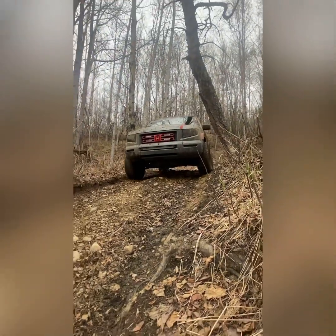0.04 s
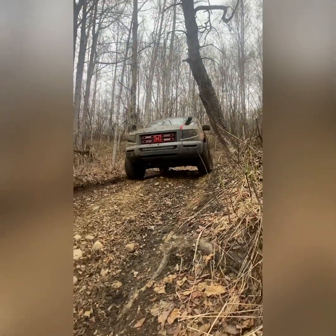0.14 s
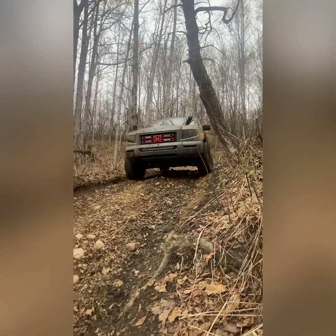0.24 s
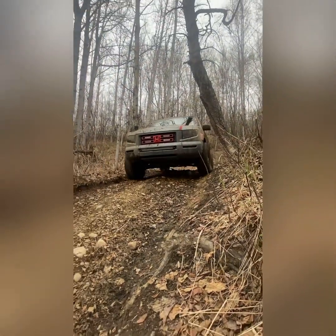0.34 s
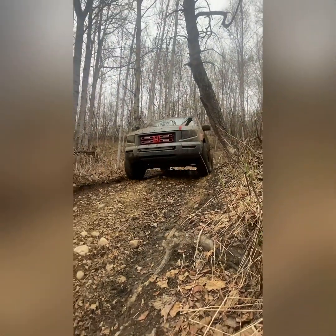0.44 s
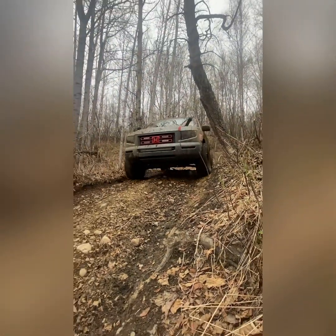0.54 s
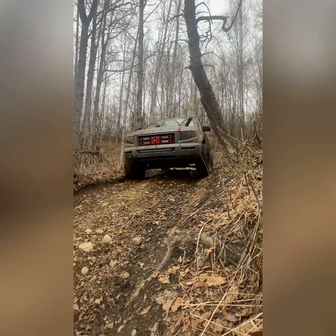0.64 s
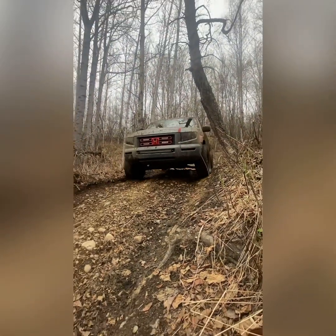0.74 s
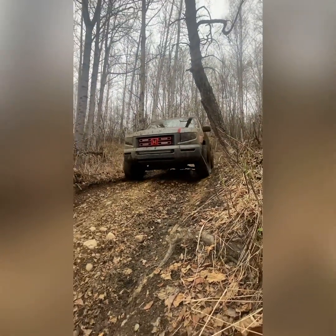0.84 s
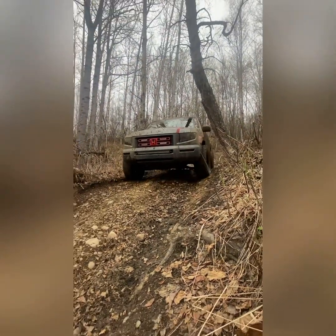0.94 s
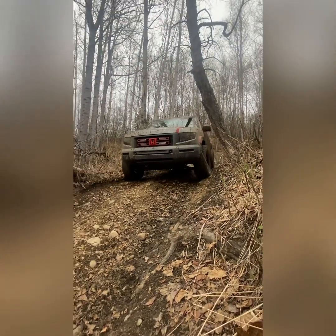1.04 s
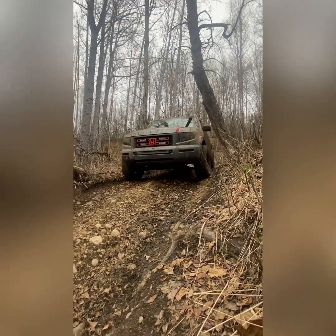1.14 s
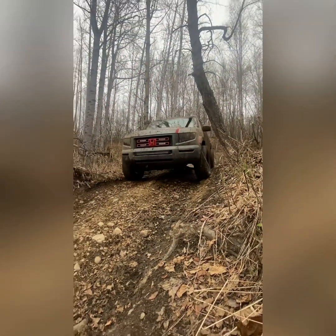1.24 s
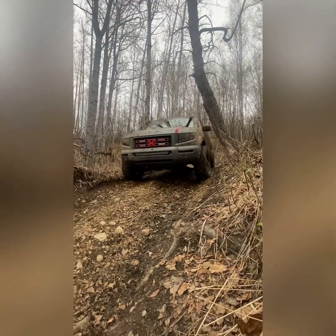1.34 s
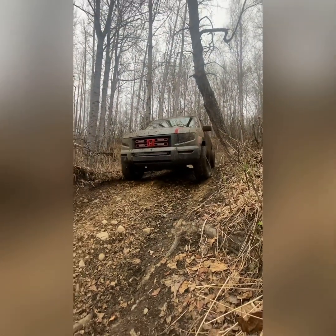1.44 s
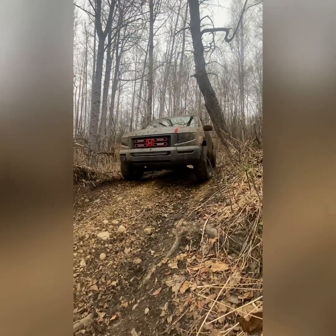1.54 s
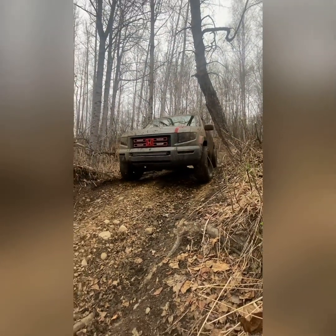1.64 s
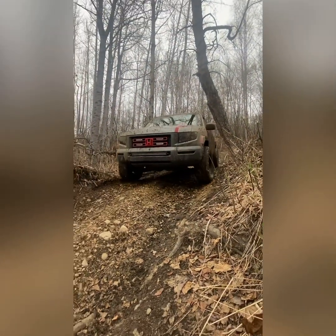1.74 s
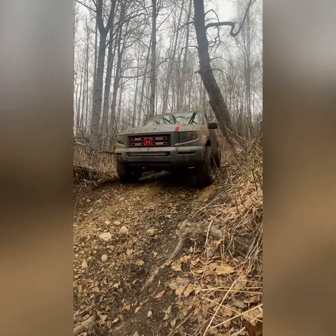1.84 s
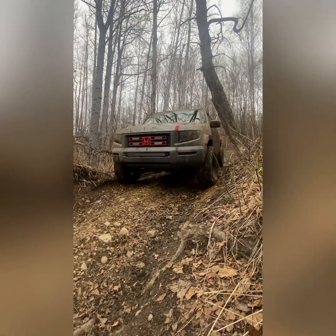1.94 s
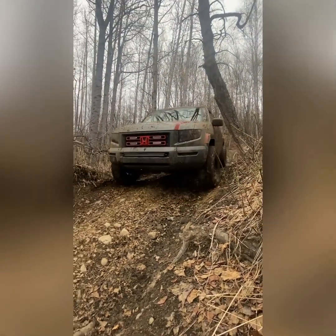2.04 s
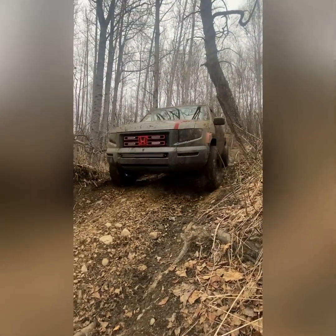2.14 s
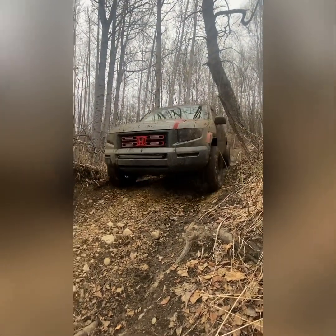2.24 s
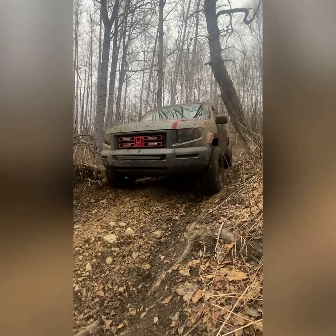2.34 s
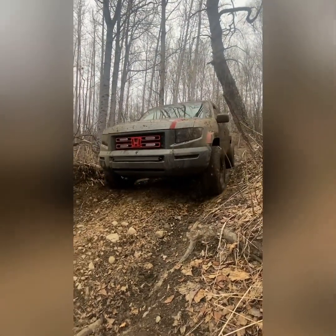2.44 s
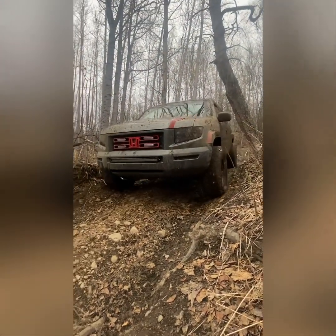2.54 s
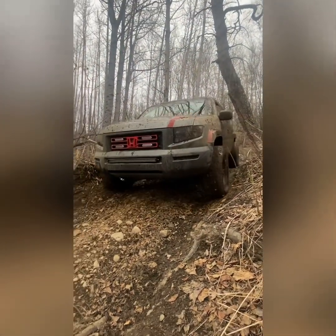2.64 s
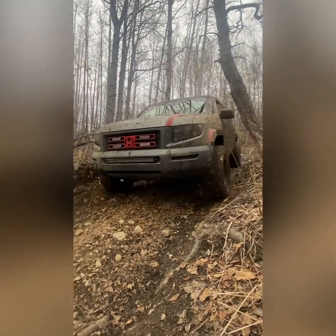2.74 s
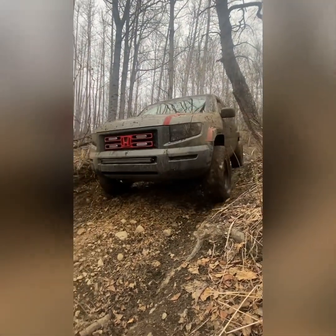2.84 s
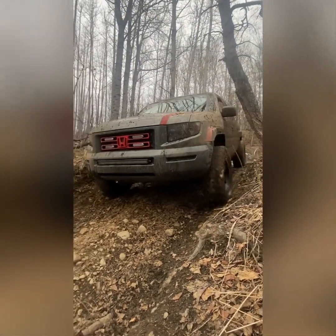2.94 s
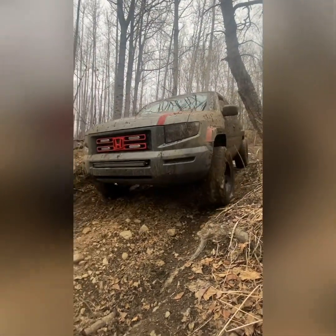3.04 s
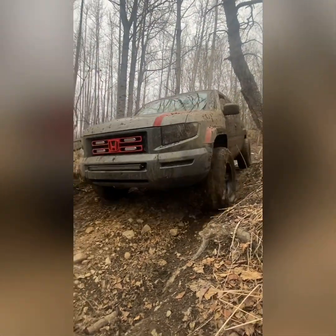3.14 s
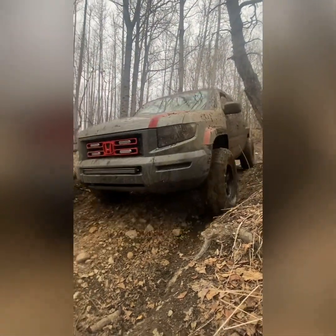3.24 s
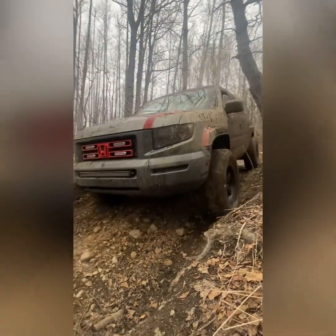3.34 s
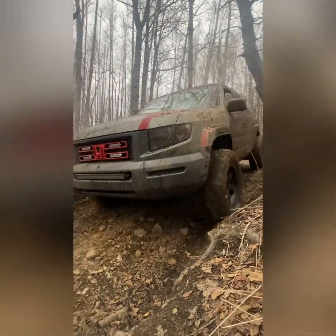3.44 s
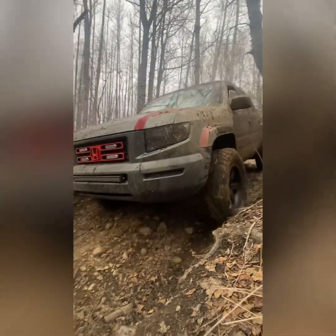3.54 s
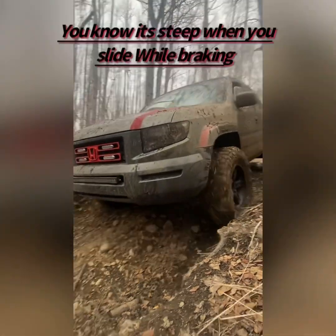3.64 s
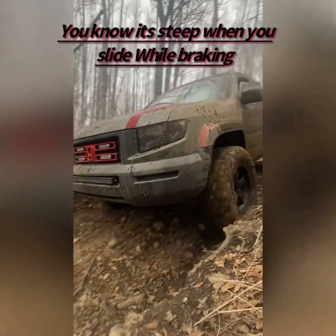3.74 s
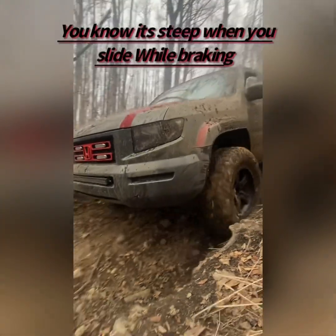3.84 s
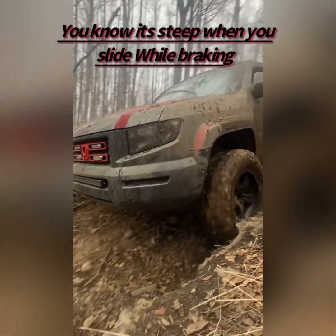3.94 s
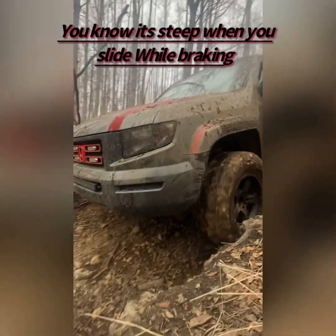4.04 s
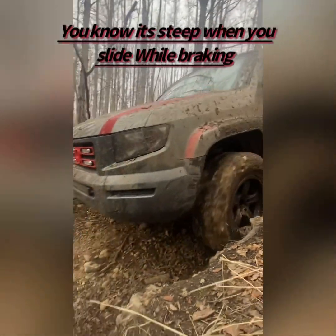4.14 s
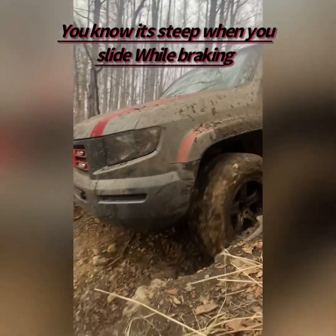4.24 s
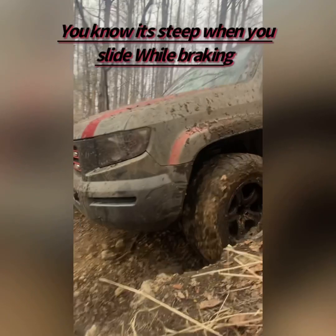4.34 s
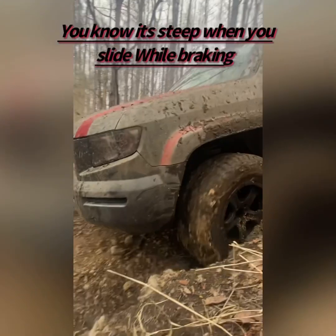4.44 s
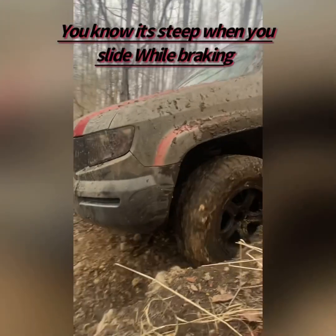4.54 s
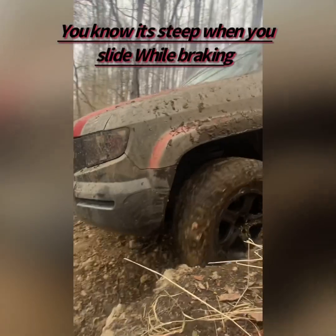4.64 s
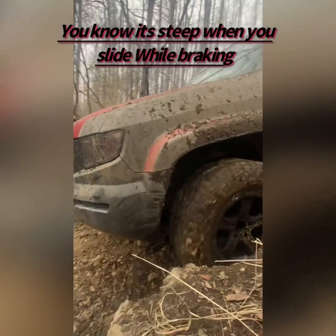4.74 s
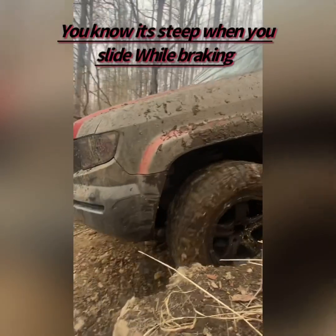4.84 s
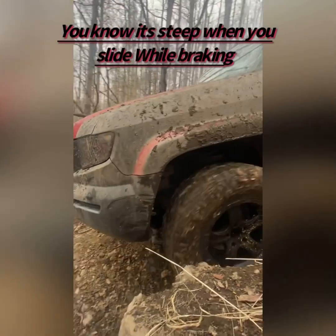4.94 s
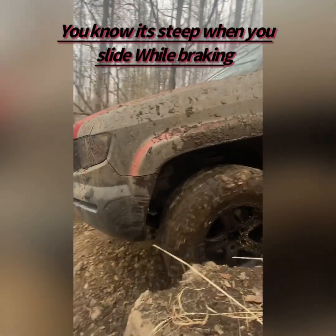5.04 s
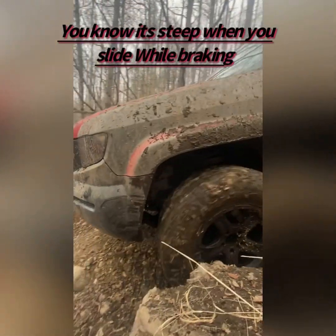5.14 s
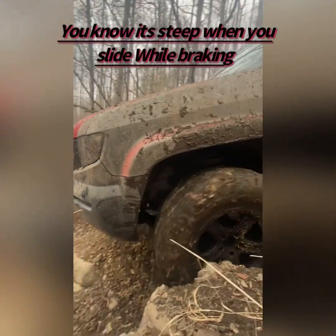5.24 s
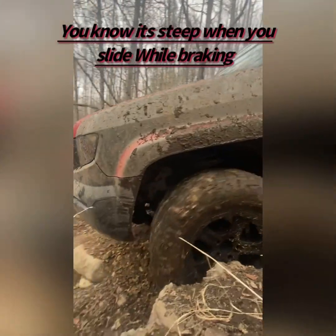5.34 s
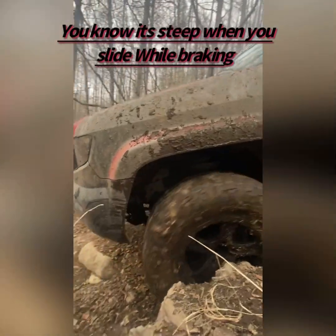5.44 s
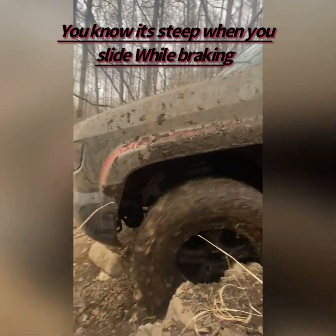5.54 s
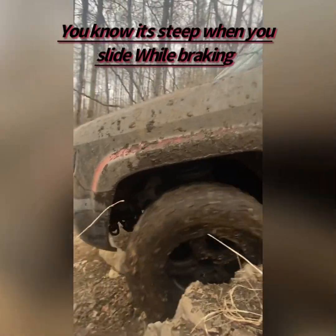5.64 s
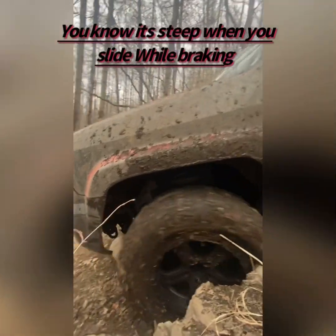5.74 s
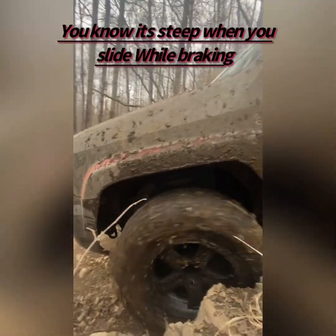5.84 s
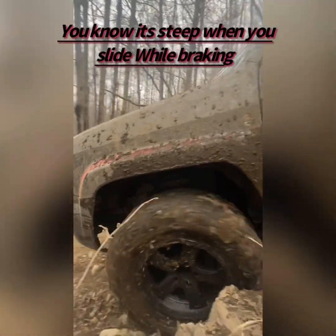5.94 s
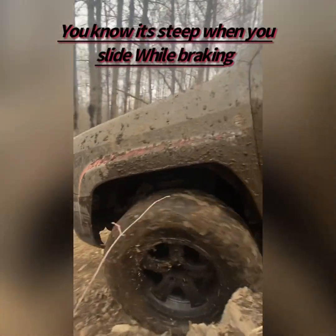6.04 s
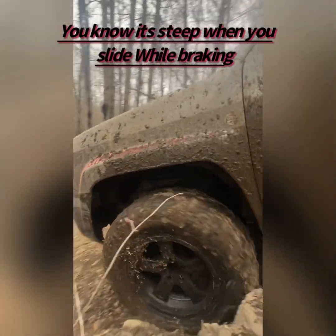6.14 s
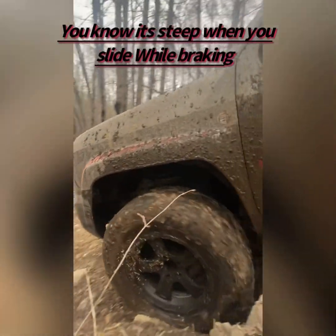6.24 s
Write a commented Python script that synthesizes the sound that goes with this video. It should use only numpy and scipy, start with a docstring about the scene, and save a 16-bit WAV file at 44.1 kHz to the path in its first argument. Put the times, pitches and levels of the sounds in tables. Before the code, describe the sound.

A truck idles slowly down a steep dirt trail, its low exhaust drone growing closer as tyres grind over gravel, knocking stones and snapping twigs.

```python
"""A steep dirt trail: a six-cylinder truck idles down it towards a phone held close to the ground.
The exhaust drones as sine lines on multiples of the firing rate, two of them strong.
The engine bay whirs as throbbing noise, through sliding panel resonances and a ground echo.
Tyres grind as shaped noise and clicks, knocking stones as gliding pitches with bursts of noise,
loose gravel as clustered grains, and twigs snap as short bands of noise."""
import sys
import numpy as np
from scipy import signal
from scipy.fft import rfft, irfft
from scipy.io import wavfile
from scipy.ndimage import uniform_filter1d

SR = 44100
rng = np.random.default_rng(int(sys.argv[2]) if len(sys.argv) > 2 else 0)


def convert_level_to_amplitude(level_db):
    """Map a level in decibels to its linear amplitude factor."""
    exponent = np.asarray(level_db, float) / 20
    return 10 ** exponent


def put_to_file(sound):
    """Save the sound as 16-bit audio at rate SR, in the file named by the first command-line argument."""
    columns = np.atleast_2d(sound).T  # one column per channel
    safe = np.clip(columns, -1, 1)
    whole_steps = np.round(safe * 32767)
    wavfile.write(sys.argv[1], SR, whole_steps.astype(np.int16))


N = 277830
TIME = np.arange(N) / SR
FREQ = np.fft.rfftfreq(N, 1 / SR)

# noise colour of a stone splitting or shifting: (f/Hz, relative density/dB)
STONE_CRACK = [(150, -5), (300, 13.5), (1000, 9.5), (2500, -14), (5000, -41)]


def unit(x):
    """Scale to rms 1."""
    return x / np.sqrt(np.mean(x ** 2))


def columns(table, at=TIME):
    """Each column after the first, joined by straight lines."""
    key, *rest = np.transpose(table)
    return [np.interp(at, key, c) for c in rest]


def colour(x, spectrum):
    """Shape a signal by (f/Hz, level/dB) points, straight over log frequency, and scale to rms 1."""
    hz, db = np.transpose(spectrum)
    gain_db = np.interp(np.log(FREQ + 1), np.log(hz), db)
    return unit(irfft(rfft(x) * convert_level_to_amplitude(gain_db), N))


def ring(x, hz, width_hz):
    """One resonance: a band-pass peak of the given width."""
    return signal.lfilter(*signal.iirpeak(min(hz, .45 * SR), hz / width_hz, fs=SR), x)


def walk(rate):
    """Random levels held 1 / rate s and slewed twice; spread near 1."""
    k = int(SR / rate)
    held = np.repeat(rng.standard_normal(N // k + 1), k)
    return 1.3 * uniform_filter1d(uniform_filter1d(held, k), k)[:N]


def grit(rate, spread_db):
    """Scattered clicks of either sign, rate per second, mostly small, a few large; rms 1."""
    u = rng.random((3, N))
    size_db = spread_db * np.minimum(-np.log(1 - u[2]), 3)
    return unit((u[0] < rate / SR) * np.sign(u[1] - .5) * convert_level_to_amplitude(size_db))


def bell_swells(events):
    """Sum of bell-shaped gains from (t loudest/s, level/dB, half length/s) rows."""
    return sum(convert_level_to_amplitude(db) * np.exp(-((TIME - s) / half_s) ** 2) for s, db, half_s in events)


def exhaust(phase, second_db, third_db):
    """The pipe booms on two multiples; uneven cylinders leave faint wavering lines between and above."""
    # fainter exhaust lines: (multiple of the firing rate, level/dB at mean load)
    faint_lines = [(7 / 3, -60.5), (8 / 3, -65), (10 / 3, -59.5), (4, -54.5), (13 / 3, -66), (5, -57),
                   (6, -58.5), (7, -59.5)]
    # lines halfway between multiples, which grow with the boom:
    # (multiple of the firing rate, level/dB against the second multiple)
    halfway_lines = [(1.5, -36.5), (2.5, -25), (3.5, -29), (4.5, -44.5), (5.5, -41.5), (6.5, -40),
                     (7.5, -42)]
    # lead of the third multiple over the boom, further lead per higher one, lead of the halfway lines
    third_rad, step_rad, half_rad = 1.3, 3.0, 2.6
    load_per_order = 0.14  # share of the boom's growth per multiple

    jitter_rad = .04 * walk(15)
    second_gain = convert_level_to_amplitude(second_db + 0.62 * walk(2.5) + 0.33 * walk(20))
    boom = second_gain * np.sin(2 * phase + jitter_rad)
    third_gain = convert_level_to_amplitude(third_db + 0.85 * walk(13))
    boom += third_gain * np.sin(3 * phase + third_rad + 2 * jitter_rad)
    # the higher a faint line, the more it grows with the load
    load_db = second_db - second_db.mean()
    for order, db in faint_lines:
        waver_db, waver_rad = 2.2 * walk(6), .35 * walk(7)
        # whole multiples come from the same firing pulse; the fractions start anywhere
        if order % 1:
            start_rad = 2 * np.pi * rng.random()
        else:
            start_rad = third_rad + step_rad * (order - 3)
        gain = convert_level_to_amplitude(db + load_per_order * order * load_db + waver_db)
        boom += gain * np.sin(order * phase + start_rad + waver_rad)
    for order, db in halfway_lines:
        boom += convert_level_to_amplitude(db + second_db + 0.94 * walk(3.81)) * np.sin(order * phase + half_rad)
    return np.sqrt(2) * boom  # table levels become rms


def bay(phase, whir_db):
    """Fan, belts and valve gear: a broad whir that throbs with each firing and rings the panels."""
    # bay resonances: (f/Hz, width/Hz, share of the slide, quiet level/dB)
    panel_modes = [(346.4, 44, 0.02, -65), (600, 78, .2, -56.5), (793, 79, .3, -57.5), (1041, 91, 1.3, -59),
                   (1310, 29, 0.0647, -61.5), (1402.4, 39, -.25, -65.5), (1980, 94, -0.11, -88),
                   (1209, 48, .3, -75), (1552, 36, .2, -70.5), (1785, 80, -0.12, -84)]
    # swells of each resonance in turn as the truck turns past: rows of (t loudest/s, level/dB, half length/s)
    panel_swells = [
        [(3.45, -49.5, 0.42), (5.9, -53, 0.72)],
        [(2.8, -57, 0.57), (4.95, -54, 0.07), (5.6, -56, 0.21)],
        [(1.8, -60, 0.4), (2.8, -45.5, 0.98), (4.2, -51, 0.49)],
        [(1.2, -60.5, 0.5), (2.7, -47.5, 0.19), (3.1, -48, 0.079), (3.8, -51.5, 0.27), (4.9, -49.5, 0.22),
         (5.5, -49.5, 0.21)],
        [(2.3, -53, 0.047), (3.5, -53.5, 0.3)],
        [(2.05, -56, 0.47), (3.9, -45.5, 0.33), (4.8, -55.5, 0.2)],
        [(.35, -64, 0.068), (3.1, -57, 0.69), (3.9, -54.5, 0.24)],
        [(.2, -55, 0.22), (2.4, -56, 0.27), (4.75, -55.5, 0.17)],
        [(3.6, -56, 0.58), (4.6, -55.5, 0.2), (5.45, -54.5, 0.15)],
        [(.3, -56, 0.43), (2.9, -53, 0.59), (4.3, -58, 0.12), (5.8, -81, 0.14)],
    ]
    # the resonances slide as the truck tilts and turns: (t/s, pitch ratio)
    pitch_slide = [(0, 0.98), (.5, 0.99), (1.3, 1.08), (2.75, 1), (3.15, 1.07), (3.5, 0.93), (4.2, 0.96),
                   (4.5, .9), (5.0, 0.94), (5.6, 1.02), (6.3, 0.94)]
    # colour of the broad whir: (f/Hz, relative density/dB)
    whir_colour = [(200, -32), (330, 0), (470, -7), (590, -2.5), (710, -2), (850, 1), (1400, -6),
                   (2000, -10), (2300, -18), (2650, -33), (3300, -30), (3700, -24), (5000, -38)]
    # thin whine from the grille, fading as it turns away: (t/s, level/dB)
    whine_level = [(0, -61.5), (1.6, -61.5), (2.4, -65.5), (6.3, -89)]
    # bands of the whine: (f/Hz, width/Hz, level/dB against the whine)
    whine_bands = [(3000, 50, -1), (3630, 240, -2)]
    ground_ms, ground_db = 4.9, -11.5  # ground echo: delay at slide ratio 1, level against the whir

    slide = columns(pitch_slide)[0] - 1
    throb = 1 + 0.074 * np.cos(phase)
    panels = 0
    for (hz, width_hz, share, quiet_db), swells in zip(panel_modes, panel_swells):
        gain = convert_level_to_amplitude(quiet_db) + bell_swells(swells)
        once = ring(throb * rng.standard_normal(N), hz, width_hz)
        steady = unit(ring(once, hz, width_hz) + 0.32 * once)
        # reading faster or slower shifts the pitch; each panel also wavers alone
        place = np.cumsum(1 + share * slide + .012 * walk(6) + .008 * walk(20))
        flutter = convert_level_to_amplitude(0.38 * walk(3.04) + 1.0 * walk(14))
        panels += gain * flutter * np.interp(place, np.arange(N), steady, period=N)

    whine = 0
    for hz, width_hz, db in whine_bands:
        whine += convert_level_to_amplitude(db) * unit(ring(rng.standard_normal(N), hz, width_hz))
    whine = convert_level_to_amplitude(columns(whine_level)[0]) * whine

    drive = throb * (rng.standard_normal(N) + 0.26 * grit(600, 2.1))
    whir = colour(drive, whir_colour)
    # the ground under the truck mirrors the whir; the late copy combs it into bands that slide too
    lag = ground_ms / 1000 * SR / (1 + 0.53 * slide)
    whir = whir + convert_level_to_amplitude(ground_db) * np.interp(np.arange(N) - lag, np.arange(N), whir, period=N)
    wobble_db = 1.0 * walk(6) + 1.0 * walk(25)
    return convert_level_to_amplitude(whir_db + wobble_db) * unit(whir) + panels + whine


def tyres(rumble_db, hiss_db, leaf_db, patches):
    """Rubber dragging over dirt rumbles and hisses, small stones tick, dry leaves prickle in patches."""
    # colours of the rumble, the dirt hiss and the leaves: (f/Hz, relative density/dB)
    rumble_colour = [(25, -20), (45, 5), (90, -4), (150, -1), (200, 0.5), (260, 0), (330, -10.5),
                     (500, -6.5), (800, -43)]
    hiss_colour = [(1500, -18), (2400, 20), (2750, 18), (3050, 16), (3300, 15.5), (3700, 11.5), (4400, 3.5),
                   (5800, 10), (7000, -1), (9000, -42.5)]
    leaf_colour = [(4000, 4), (6500, 11.5), (8000, 14), (10000, 3), (12500, -1), (14800, -29), (15700, -41),
                   (15900, -55)]
    ticks_per_s, ticks_db = 110, -7  # stones ticking under the tread; level against the rumble

    rumble_gain = convert_level_to_amplitude(rumble_db + 1.6 * walk(6.15) + 0.8 * walk(29.0))
    rumble = rumble_gain * colour(rng.standard_normal(N), rumble_colour)
    ticks = convert_level_to_amplitude(rumble_db + ticks_db) * colour(grit(ticks_per_s, 2.1), STONE_CRACK)
    crush = rng.standard_normal(N) + .4 * convert_level_to_amplitude(2.5 * patches) * grit(1500, 3.0)
    patch_db = .6 * patches + .8 * walk(20)
    hiss = convert_level_to_amplitude(hiss_db + patch_db) * colour(crush, hiss_colour)
    leaves = convert_level_to_amplitude(leaf_db + 0.74 * patches + 1.6 * walk(16)) * colour(crush, leaf_colour)
    return rumble + ticks + hiss + leaves


def stones():
    """Each knock is a few cycles gliding in pitch over a burst of crack, then a scatter off the bodywork."""
    # stones knocking under the tread: (t/s, level/dB, first pitch f/Hz, last pitch f/Hz, decay/ms)
    knocks = [(2.139, -32, 800, 485, 2.4), (2.415, -35.5, 797, 380, 8.4), (3.914, -33, 746, 640, 3.9),
              (3.926, -33, 684.2, 680, 3.5), (3.939, -31, 800, 700, 3.1), (3.9574, -23, 1520, 405, 3.03),
              (3.963, -29.5, 493, 322, 3.7), (4.019, -32, 990, 680, 5.4), (4.5225, -31.5, 1320, 706, 2.5),
              (5.154, -37, 1112, 700, 2), (5.1872, -26, 1400, 1064, 1.6), (5.192, -31, 1200, 1000, 1.9),
              (5.212, -31, 1100, 700, 1.5), (5.22, -35, 900, 1200, 2), (5.244, -37, 1200, 1100, 1.5),
              (5.257, -34, 1200, 1000, 1.5), (5.264, -29, 1600, 700, 1.3), (5.447, -34.5, 895, 1050, 3.4),
              (5.625, -32, 1110, 997, 1.9), (5.664, -23, 1690, 600, 5.8), (5.673, -21, 884, 650, 0.89),
              (5.705, -37, 1150, 1100, 2.5), (6.067, -38, 999, 900, 1.5), (6.08, -40, 900, 600, 1.9),
              (6.093, -31.5, 1500, 900, .8), (6.113, -32, 890, 790, 4.5), (6.126, -32, 1310, 700, 1.8),
              (6.133, -28.5, 700, 600, 3.9), (6.178, -35.5, 1100, 1000, 2)]
    out = np.zeros(N)
    t_ms = np.arange(int(.06 * SR)) / SR * 1000
    crack = colour(rng.standard_normal(N), STONE_CRACK)
    for s, db, first_hz, last_hz, decay_ms in knocks:
        swell_ms = 0.625 * decay_ms  # rise time, also the time constant of the glide
        hz = last_hz + (first_hz - last_hz) * np.exp(-t_ms / swell_ms)
        rise = np.sin(np.pi / 2 * np.minimum(t_ms / swell_ms, 1)) ** 2
        after = np.maximum(t_ms - swell_ms, 0) / decay_ms
        tone = np.sin(2 * np.pi * np.cumsum(hz) / SR)
        i = int(s * SR)
        span = slice(i, i + len(t_ms))
        out[span] += convert_level_to_amplitude(db) * rise * np.exp(-after) * tone
        # the crack is fainter and dies more slowly than the tone
        out[span] += convert_level_to_amplitude(db - 11.5) * rise * np.exp(-after / 3.1) * crack[span]
    tail = rng.standard_normal(len(t_ms)) * np.exp(-t_ms / 12) * (t_ms > 3)
    return out + convert_level_to_amplitude(-34) * signal.fftconvolve(out, tail)[:N]


def gravel(grains):
    """Short bursts of many small stones turning over each other: clicks blended with noise."""
    # loose gravel grinding under the tread: (t loudest/s, level/dB, half length/s)
    crunches = [(2.42, -51, 0.028), (3.923, -41, .02), (3.966, -37.5, .018), (4.533, -40, 0.0088),
                (5.198, -48, 0.013), (5.453, -41, .025), (5.54, -46, .03), (5.688, -43.5, .015),
                (6.092, -44.5, 0.017), (6.12, -41, 0.022), (6.173, -47.5, 0.017), (6.242, -50.5, 0.022)]
    # colour of the grinding: (f/Hz, relative density/dB)
    grind_colour = [(200, -16), (550, 4.5), (900, -5.5), (1600, -4.5), (2500, -17.5), (4000, -24),
                    (6500, -26), (9000, -41)]
    return bell_swells(crunches) * colour(grains + 0.95 * rng.standard_normal(N), grind_colour)


def twigs(fibres):
    """Each snap is splintering noise around one pitch that builds in a moment and dies away in spurts."""
    # twigs and dry leaves breaking: (t/s, level/dB, centre f/Hz, decay/ms)
    snaps = [(1.301, -56, 7720, 14), (2.318, -51, 8500, 11), (2.327, -39, 2360, 16),
             (2.328, -47, 4200, 13.5), (2.328, -45, 8300, 7), (3.704, -49, 4830, 4.1),
             (3.908, -50, 5460, 22), (3.914, -40, 2800, 19), (3.936, -52, 3300, 11),
             (4.119, -36, 5900, 2.8), (4.228, -51, 10500, 3), (4.24, -49, 6000, 22),
             (4.244, -54, 5970, 6.9), (4.328, -45, 5950, 2), (4.4005, -38, 6200, 2.6),
             (4.522, -36.5, 2240, 11.5), (4.872, -48, 5800, 2), (4.59, -59, 9450, 31), (4.95, -53, 9000, 3),
             (5.185, -61, 10500, 6), (5.262, -57, 10000, 4), (5.452, -54.5, 10600, 14),
             (5.51, -55.5, 9900, 42), (5.55, -55, 9200, 14), (5.667, -45, 3000, 7), (5.75, -54.5, 8100, 23),
             (5.801, -59, 10000, 33), (5.827, -48, 5600, 8), (5.92, -46, 5930, 14),
             (5.93, -42.5, 4300, 9.1), (6.075, -52, 3480, 17), (6.095, -53, 4470, 12),
             (6.113, -41, 2500, 11), (6.122, -44.5, 5800, 12), (6.165, -49, 4500, 20),
             (6.238, -44, 2900, 31)]
    out = np.zeros(N)
    t_ms = np.arange(int(.1 * SR)) / SR * 1000
    for s, db, hz, decay_ms in snaps:
        width_hz = 0.48 * hz  # of each of the two resonances in a row
        wide = ring(rng.standard_normal(len(t_ms)), hz, width_hz)
        burst = ring(wide, hz, width_hz) + 0.06 * wide
        shape = np.minimum(t_ms / (0.31 * decay_ms), 1) * np.exp(-t_ms / decay_ms)
        i = int(s * SR)
        shape = shape * fibres[i % SR:i % SR + len(t_ms)]
        out[i:i + len(t_ms)] += (convert_level_to_amplitude(db) * unit(burst) * shape)[:N - i]
    return out


def stereo_image(direct, other, focus=1):
    """Left and right by frequency; part of a wide source reaches only one side."""
    # stereo image by frequency: (f/Hz, left minus right level/dB, left lead/rad, share common to both); above 7
    # kHz the lead climbs in steps
    stereo_by_freq = [(0, 0, 0, 1), (70, 0, .09, 1), (150, -1, .2, .99), (320, -2, .6, .92), (490, 1.5, 1.3, .8),
                      (740, 6, 1.7, .85), (1130, 8, 1.2, .8), (1500, 8, 1.2, .8), (1800, 2, .6, .45),
                      (2600, 1, 2.8, .78), (3400, 0, 3.1, .75), (3900, 0, 2.5, .15), (5300, 0, .8, .5),
                      (7200, 0, 3, .85), (8000, 0, 3.2, .9), (9300, 0, 5.2, .6), (9800, 0, 6.3, .98),
                      (11100, 0, 6.3, .98), (11900, 0, 7.8, .6), (12700, 0, 9.4, .98), (14500, 0, 9.4, .98),
                      (15500, 0, 12.6, .9)]
    db, lead, share = columns(stereo_by_freq, FREQ)
    share = np.clip(focus * share, 0, 1)
    left = rfft(direct)
    right = share * left * np.exp(-1j * lead) + np.sqrt(1 - share ** 2) * rfft(other)
    return np.array([irfft(left * convert_level_to_amplitude(db / 2), N), irfft(right * convert_level_to_amplitude(-db / 2), N)])


def scene():
    """The pipe is a single point; bay and tyres are wide; stones, gravel and twigs scatter in part."""
    # the engine: (t/s, firing rate f/Hz, second multiple level/dB, third multiple level/dB)
    engine_run = [(0, 34.91, -31.5, -40), (.6, 35.02, -32, -43), (1.05, 34.16, -32, -40),
                  (1.6, 34.86, -32, -40.5), (2.0, 34.1, -32, -41), (2.17, 33.09, -31.5, -46),
                  (2.25, 33.9, -28, -41), (2.36, 36.87, -25.5, -33.5), (2.46, 35.37, -24, -33),
                  (2.7, 35.31, -23.5, -33), (2.85, 36.04, -23, -32), (3.1, 35.11, -22, -31),
                  (3.45, 35.03, -22, -33), (3.62, 34.06, -21.5, -33), (3.95, 33.74, -21, -36),
                  (4.23, 32.56, -20.5, -41), (4.75, 31.97, -19.5, -40.5), (5.0, 32.42, -20, -40),
                  (5.25, 33.88, -21.5, -35), (5.55, 33.5, -21.5, -33), (5.75, 32.75, -21.5, -34.5),
                  (6.05, 33.68, -21, -34), (6.3, 33.7, -21.5, -35.5)]
    # steady layers: (t/s, tyre rumble level/dB, bay whir level/dB, dirt hiss level/dB, leaf prickle level/dB)
    bed_levels = [(0, -57, -47.5, -65, -66), (.95, -60, -45, -64, -66.5), (1.85, -54.5, -46.5, -60.5, -65),
                  (2.5, -46.5, -45, -58.5, -65), (2.85, -49, -43, -58, -62),
                  (3.5, -46.5, -41.5, -56.5, -62), (4.0, -51, -43, -56.5, -62), (4.3, -48, -44.5, -56, -61),
                  (4.8, -50, -45, -57.5, -64.5), (5.2, -43, -45.5, -60.5, -65),
                  (5.55, -41, -44.5, -55.5, -65.5), (5.9, -46.5, -43.5, -56.5, -64),
                  (6.3, -41.5, -45.5, -55.5, -58.5)]

    hz, second_db, third_db = columns(engine_run)
    hunt = 0.0031 * walk(5.22)  # the idle governor hunts, as a share of the firing rate
    phase = 2 * np.pi * np.cumsum(hz * (1 + hunt)) / SR
    pipe = exhaust(phase, second_db, third_db)
    # the exhaust reaches the right port 0.21 ms late
    pipe = np.array([pipe, np.interp(TIME - .21 / 1000, TIME, pipe)])

    rumble_db, whir_db, hiss_db, leaf_db = columns(bed_levels)
    patches = walk(14)
    near, far = (bay(phase, whir_db) + tyres(rumble_db, hiss_db, leaf_db, patches) for _ in range(2))

    fibres = convert_level_to_amplitude(2.0 * walk(400))
    grains = grit(1000, 3.5)
    breaks = stereo_image(stones(), stones(), focus=0.91)
    breaks += stereo_image(gravel(grains), gravel(grains), focus=0.84)
    breaks += stereo_image(twigs(fibres), twigs(fibres), focus=0.64)
    return pipe + breaks + stereo_image(near, far)


def low_pass(x):
    """Removes everything above the highest recorded frequency."""
    return signal.sosfilt(signal.butter(12, 15760, fs=SR, output="sos"), x)


def record(dry):
    """The finished mix as the phone delivers it."""
    return low_pass(dry)


dry = scene()
out = record(dry)
put_to_file(out)
```